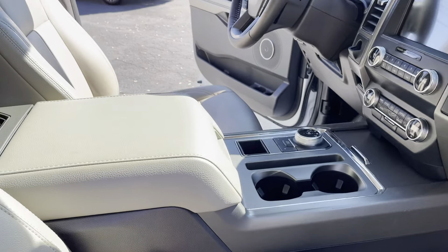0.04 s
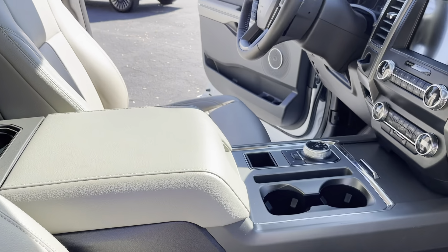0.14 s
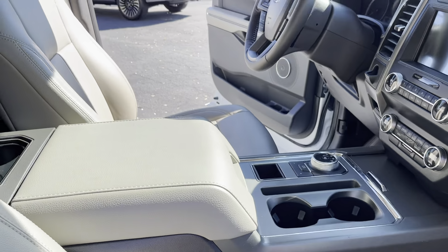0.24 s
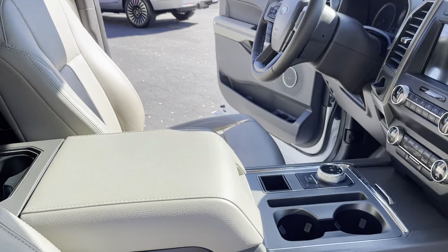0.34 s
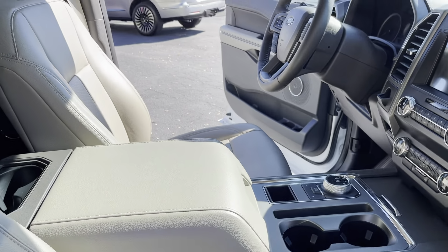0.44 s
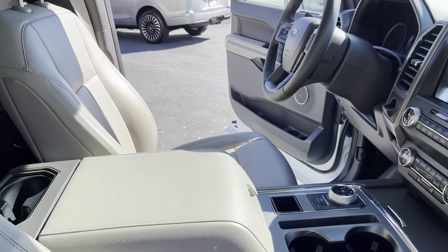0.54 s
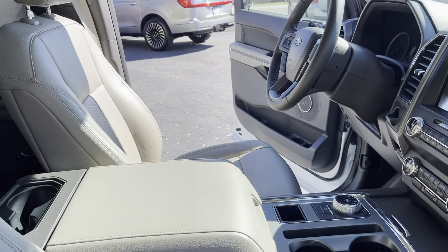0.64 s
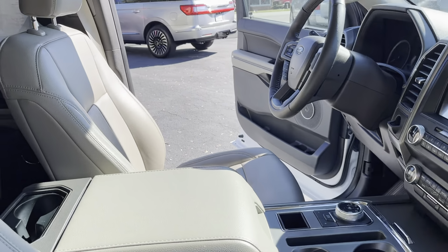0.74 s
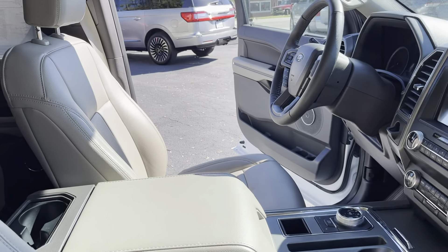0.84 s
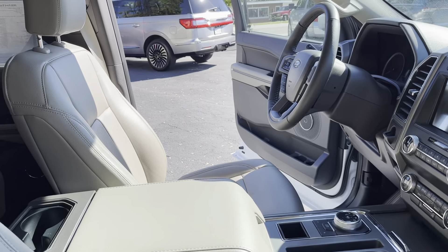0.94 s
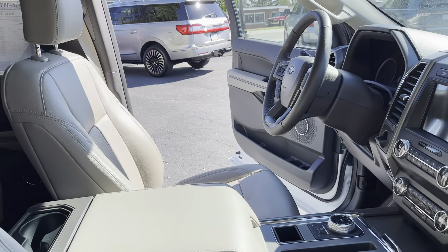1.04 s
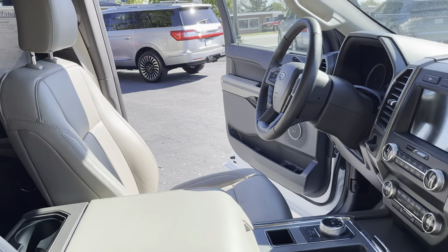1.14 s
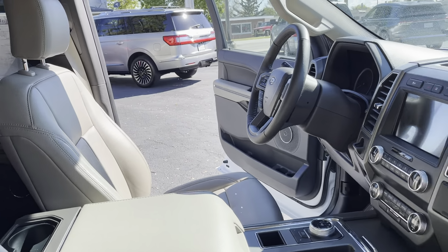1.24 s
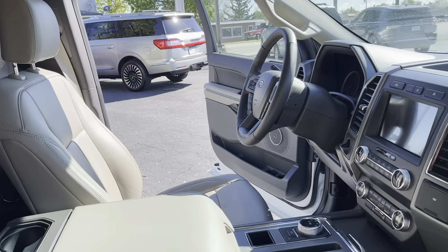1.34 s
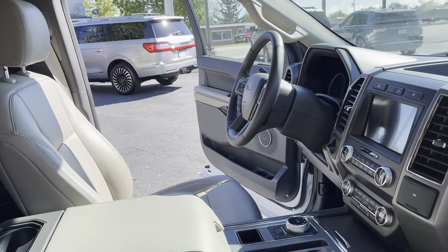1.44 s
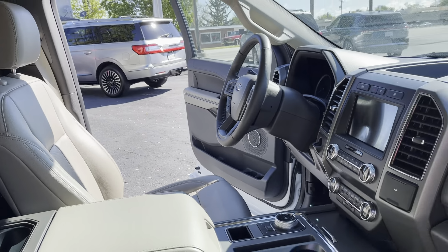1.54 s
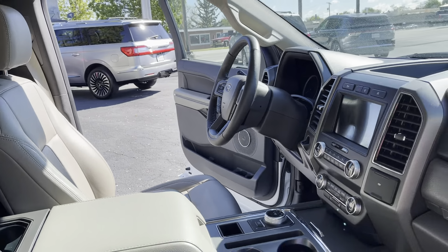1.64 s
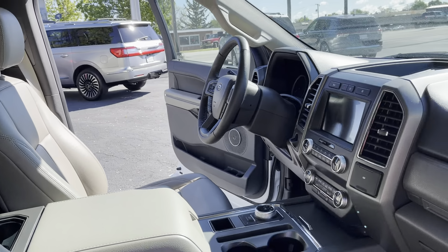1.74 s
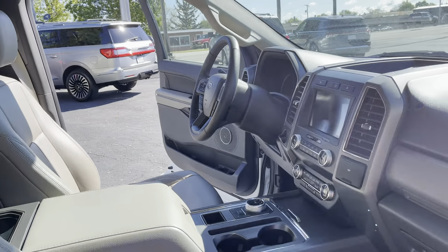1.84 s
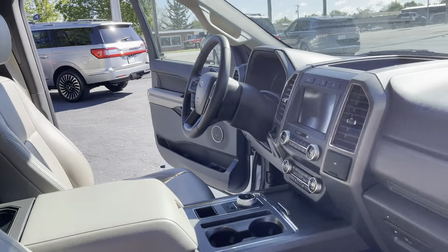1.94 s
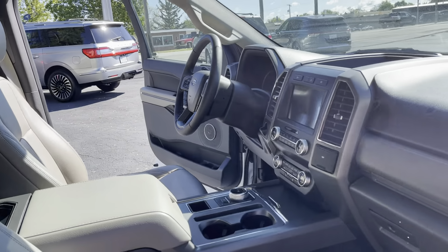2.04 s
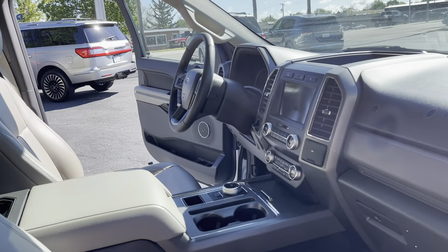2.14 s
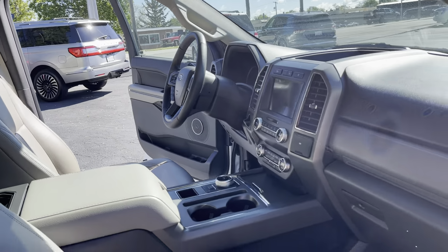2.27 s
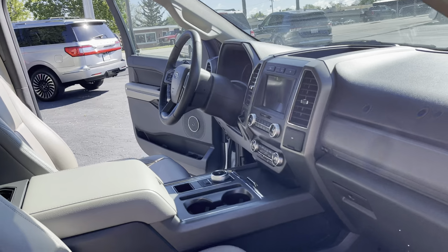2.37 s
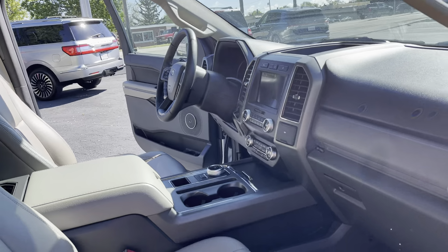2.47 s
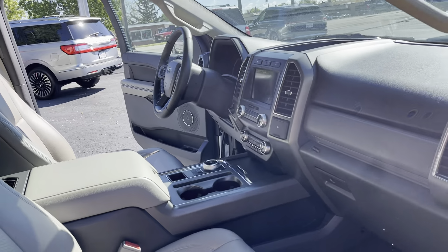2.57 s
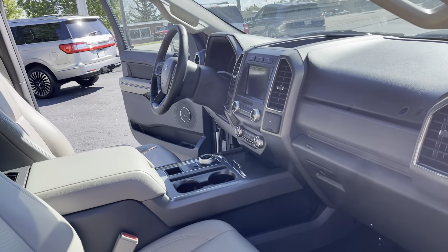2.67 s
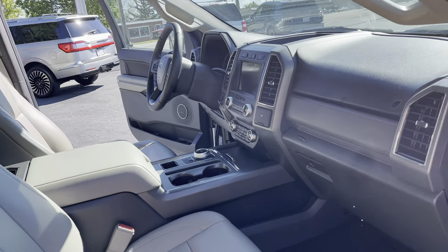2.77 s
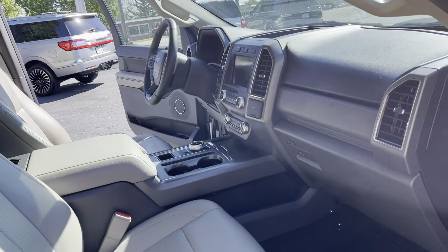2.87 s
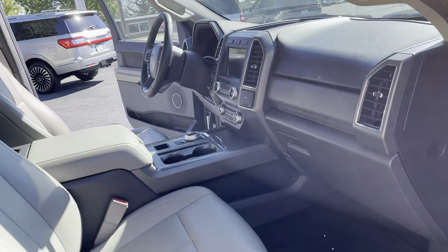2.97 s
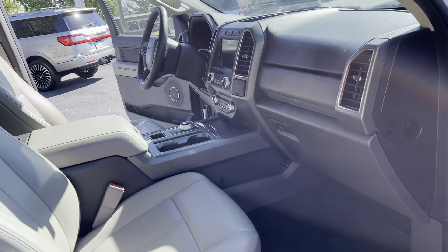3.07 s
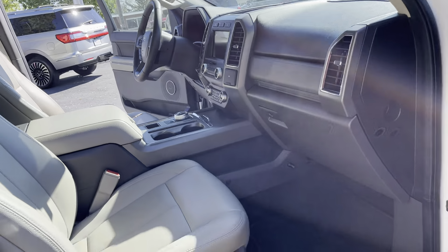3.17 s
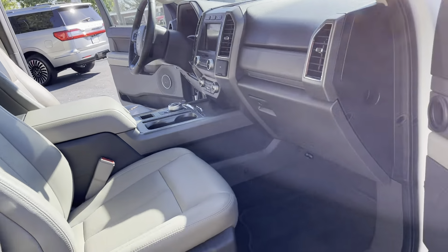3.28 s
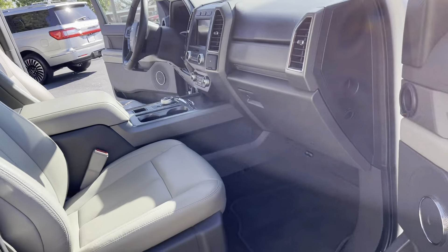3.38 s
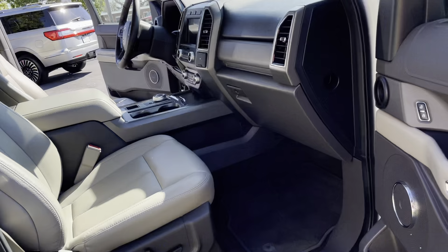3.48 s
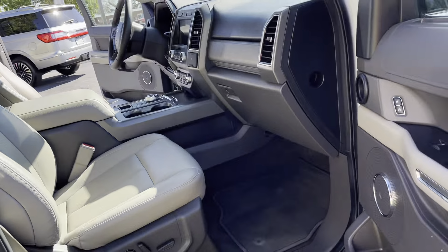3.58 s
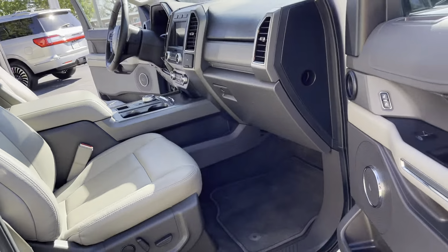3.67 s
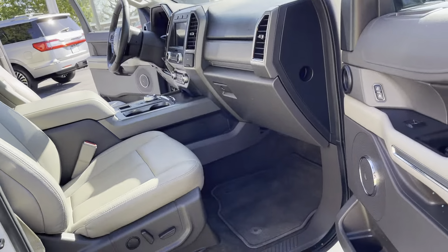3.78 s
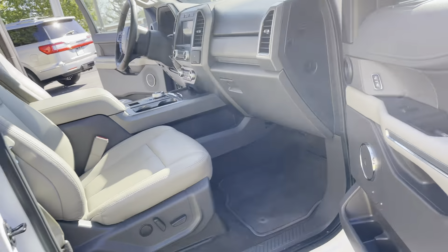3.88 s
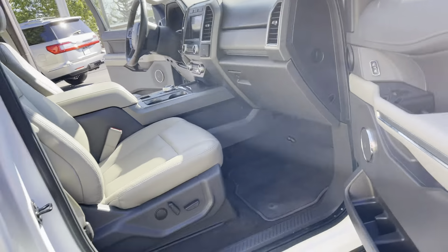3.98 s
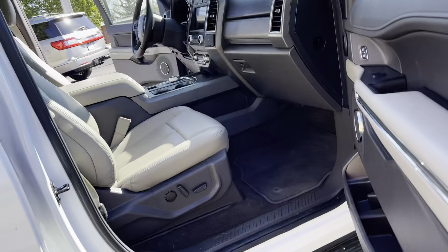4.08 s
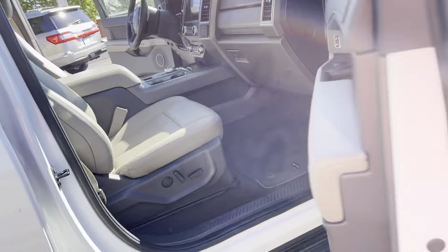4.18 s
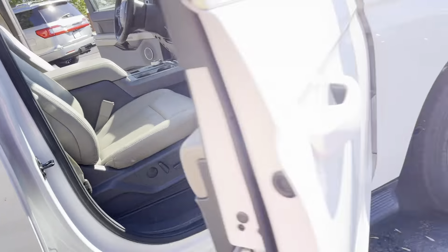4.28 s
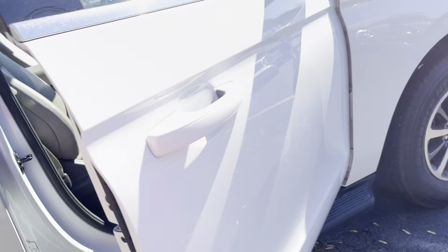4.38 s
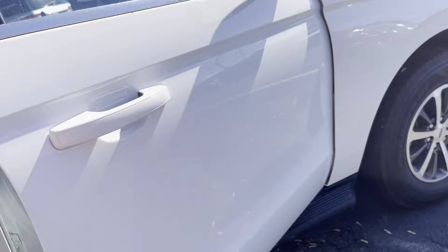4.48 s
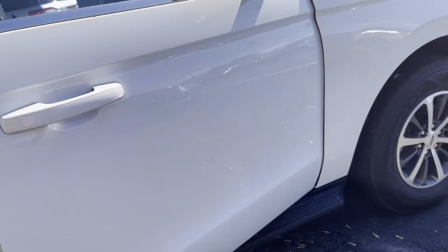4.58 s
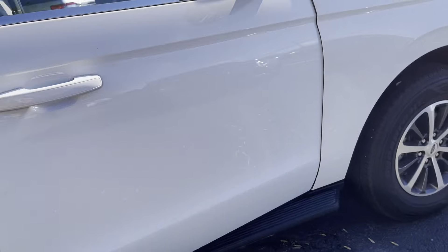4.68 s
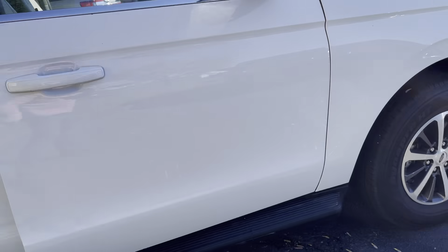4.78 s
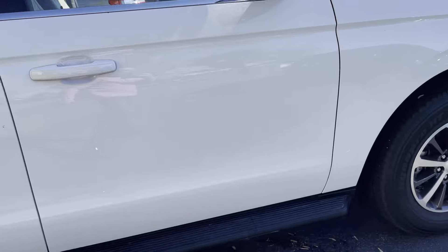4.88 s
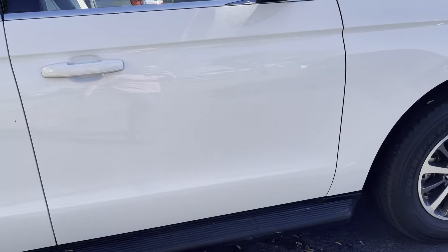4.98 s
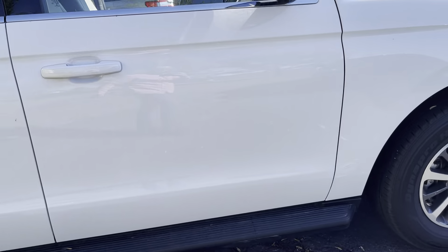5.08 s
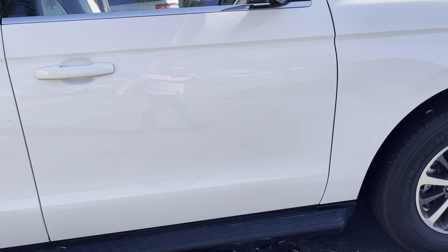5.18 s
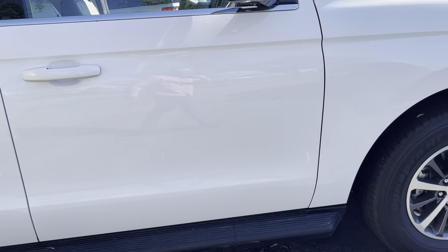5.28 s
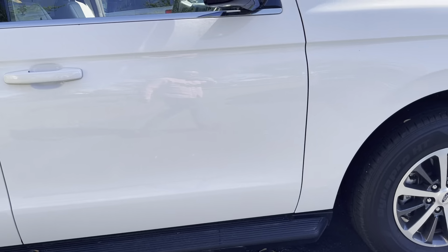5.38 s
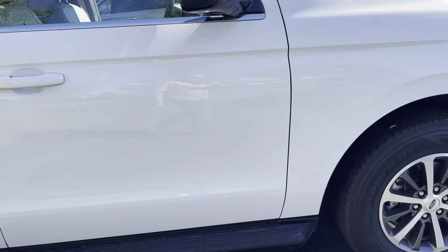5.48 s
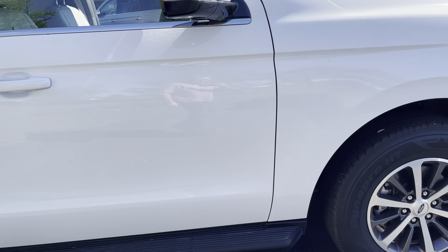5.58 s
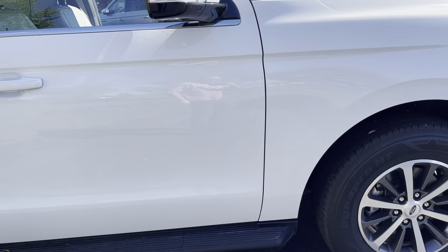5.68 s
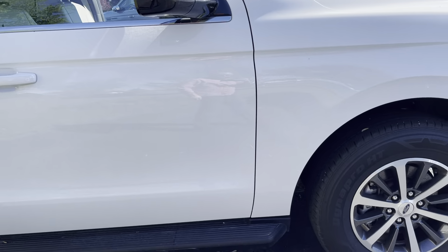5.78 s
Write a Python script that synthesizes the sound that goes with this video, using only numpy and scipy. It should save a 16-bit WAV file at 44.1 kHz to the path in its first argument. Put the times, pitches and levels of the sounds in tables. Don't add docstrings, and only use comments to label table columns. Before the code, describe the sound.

Low uneven wind buffeting and small gritty footstep sounds lead to one loud, close car door slam, followed by stronger wind rumble.

```python
import sys
import numpy as np
from scipy import signal
from scipy.fft import rfft, irfft
from scipy.io import wavfile
from scipy.ndimage import uniform_filter1d

SR = 44100
rng = np.random.default_rng(int(sys.argv[2]) if len(sys.argv) > 2 else 0)


def materialize(psi):
    bounded = np.clip(np.atleast_2d(psi).T, -1, 1)
    quanta = np.round(bounded * 32767).astype(np.int16)
    wavfile.write(sys.argv[1], SR, quanta)


def invert_db(x):
    u = np.asarray(x, float) / 20
    return 10 ** u


N = 256662

# t/s, rattle level/dB, treble against it/dB, treble t60/s
BLOWS = [
    (4.899, -41, -8, .15),
    (4.9037, -16.5, -27, 0.041),
    (4.9139, -8.5, -1.5, 0.055),
    (4.9195, -17.5, 2.5, 0.042),
    (4.925, -24, 2, 0.038),
    (4.932, -18.5, -15, 0.087),
    (4.943, -17.5, -8.5, 0.071),
    (4.952, -30, -28, 0.14),
    (4.978, -33.5, -14, 0.29),
]
# f/Hz, left-right correlation
FIELD_LIKENESS = [(60, 0.87), (130, 0.87), (270, 0.92), (590, -0.095), (1250, -0.22), (2670, 0.35),
                  (5710, 0.3), (12200, -0.04)]
# f/Hz, left-right correlation
NEAR_LIKENESS = [(60, 0.81), (130, 0.52), (270, 0.86), (590, 0.87), (1250, 0.27), (2670, 0.4), (4200, 0.69),
                 (5710, 1), (8800, .8), (10400, 0.3), (12200, 0.49)]


def read(points, hz):
    f, value = np.transpose(points)
    return np.interp(np.log(hz + 1), np.log(f + 1), value)


def curve(rows):
    s, *columns = np.transpose(rows)
    t = np.arange(N) / SR
    return [np.interp(t, s, column) for column in columns]


def evened(x):
    return x / np.sqrt(np.mean(x ** 2) + 1e-20)


def add(mix, s, sound):
    part = mix[..., round(s * SR):][..., :sound.shape[-1]]
    part += sound[..., :part.shape[-1]]


def noise(colour, likeness, band, patchy_db=0.):
    hz = np.fft.rfftfreq(1024, 1 / SR)
    a, b, c, d, patches = rng.standard_normal((N // 256 + 5, 513, 5)).T
    patches = uniform_filter1d(patches, size=8, axis=0)
    patches = evened(uniform_filter1d(patches, size=12, axis=1))
    like = np.clip(read(likeness, hz), -1, 1)[:, None]
    left, other = a + 1j * b, c + 1j * d
    z = np.array([left, like * left + np.sqrt(1 - like ** 2) * other])
    z *= invert_db(read(colour, hz)[:, None] + patchy_db * patches)
    x = signal.istft(z, nperseg=1024, noverlap=768)[1][:, :N]
    power, f = abs(rfft(x.mean(0))) ** 2, np.fft.rfftfreq(N, 1 / SR)
    in_band = (f > band[0]) & (f < band[1])
    return x / np.sqrt(2 * power[in_band].sum()) * N


def port_noise(colour, likeness):
    a, b = rng.standard_normal((2, N))
    pair = np.array([a, likeness * a + np.sqrt(1 - min(likeness, 1) ** 2) * b])
    colour_gain = invert_db(read(colour, np.fft.rfftfreq(N, 1 / SR)))
    return evened(irfft(rfft(pair) * colour_gain, N))


def lumps(per_s):
    hz = np.fft.rfftfreq(N, 1 / SR)
    return evened(irfft(rfft(rng.standard_normal(N)) / (1 + (hz / per_s) ** 4), N))


def swell(rise, t60):
    t = np.arange(SR // 2) / SR
    shape = np.sin(np.pi / 2 * np.minimum(t / max(rise, 1e-4), 1)) ** 2
    return t, shape * invert_db(-60 * np.maximum(t - rise, 0) / t60)


def ring(db, hz, rise, t60):
    t, shape = swell(rise, t60)
    return invert_db(db) * shape * np.sin(2 * np.pi * hz * t)


def wavelet(hz, cycles, turn):
    u = np.arange(0, 1, hz / (cycles * SR))
    phase = cycles * (1.364 * u - .5 * u ** 2) + turn
    return np.cos(2 * np.pi * phase) * np.sin(np.pi * u ** 0.68) ** 2


def door():
    # f/Hz, density/dB per Hz
    rattle = [(240, -18), (400, -4.5), (812, -11.5), (1130, -27), (1350, -17.5), (1630, -26.5), (1910, -21),
              (3930, -26), (4810, -25.5), (6510, -30.5), (8320, -28.5), (12100, -32.5), (13000, -44),
              (13700, -68), (15200, -48), (16200, -90)]
    # f/Hz, left over right/dB
    balance = [(60, 0), (110, -1), (200, -1), (350, 4.5), (640, 3), (1150, 3.5), (2080, 1.5), (3750, 3.0),
               (6760, 3.5), (12200, 1)]
    # t/s, peak level/dB, f/Hz, rise/s, t60/s
    modes = [(4.9011, -18, 1383, 0.0038, 0.028), (4.9035, -24, 800, 0.0048, 0.031),
             (4.902, -24, 400, .004, .04), (4.9140, -17, 660, 0.0032, 0.058),
             (4.914, -20, 450.6, .004, 0.18), (4.9144, -26, 805, 0.0053, 0.035),
             (4.9149, -19, 552, .004, 0.087), (4.9147, -14.5, 244.4, 0.009, 0.22),
             (4.9152, -19, 301, 0.0039, 0.26), (4.9132, -13, 206.7, 0.005, 0.17),
             (4.9145, -18, 470, 0.0023, 0.036), (4.9178, -10.5, 796, .0025, 0.046),
             (4.9217, -16.5, 149.1, 0.01, 0.45), (4.912, -8, 77.3, 0.025, 0.098),
             (4.9194, -14, 123.3, .012, 0.25), (4.922, -15.5, 49.5, 0.029, 0.44),
             (4.9361, -7, 64.2, 0.032, 0.077), (4.9440, -13, 418, 0.0031, 0.057),
             (4.950, -23, 701, 0.0051, 0.06), (4.931, -22, 751, .004, .07), (4.968, -27, 377, .004, .07),
             (4.99, -34, 620, .005, .08)]
    low, high, out = np.zeros(N), np.zeros(N), np.zeros((2, N))
    for s, db, treble_db, t60 in BLOWS:
        add(low, s, invert_db(db) * swell(0.0016, 1.15 * t60)[1])
        add(high, s, invert_db(db + treble_db) * swell(0.00068, t60)[1])
    hz = np.fft.rfftfreq(N, 1 / SR)
    shiver = rfft(noise(rattle, NEAR_LIKENESS, (300, 15000)))
    shiver *= invert_db(np.outer([.5, -.5], read(balance, hz)) - 3.5)
    upper = 1 / (1 + (2200 / (hz + 1)) ** 4)
    chatter = invert_db(0.64 * lumps(per_s=630))
    out += low * irfft(shiver * (1 - upper), N)
    out += high * chatter * irfft(shiver * upper, N)
    for s, db, mode_hz, rise, t60 in modes:
        side_db = read(balance, mode_hz) / 2
        sound = ring(db, mode_hz, rise, t60)
        if mode_hz > 180:
            sound = sound + ring(db - 11.5, mode_hz * 1.07, 3 * rise, t60)
        add(out[0], s, invert_db(side_db) * sound)
        add(out[1], s + 0.00019, invert_db(-side_db) * sound)
    return out


def tap():
    # f/Hz, level/dB, t60/s
    skin = [
        (1620, 3.5, 0.012),
        (2040, -26, 0.023),
        (2980, -11, 0.017),
    ]
    # delay/s, level/dB
    paths = [
        (0, 1),
        (.0048, -11),
        (.0075, -12),
    ]
    # f/Hz, density/dB per Hz
    crack_colour = [(530, -49), (900, -19), (2040, -2.5), (2600, -11), (4680, -20), (5340, -25),
                    (8500, -22), (11600, -34), (12700, -63), (16500, -93), (22000, -120)]
    tap_s, tap_db, crack_t60 = 4.1103, -24.5, .03
    knock = sum(ring(db, hz, 0.0003, t60) for hz, db, t60 in skin)
    out, crack = np.zeros((2, N)), np.zeros(N)
    for lag, db in paths:
        add(out[0], tap_s + lag, invert_db(tap_db + db) * knock)
        add(out[1], tap_s + lag * 1.06 + 0.0001, invert_db(tap_db + db - 1.5) * knock)
        add(crack, tap_s + lag, invert_db(tap_db + db - 10.0) * swell(0.00044, crack_t60)[1])
    return out + crack * noise(crack_colour, NEAR_LIKENESS, (1000, 12000))


def wind():
    # t/s, level/dB
    strength = [(0.0, -39.5), (.34, -61.5), (.58, -48.5), (.91, -59), (1.2, -50.5), (1.92, -56),
                (2.34, -45), (3.04, -42.5), (3.26, -47.5), (3.48, -45), (3.7, -54.5), (4.42, -43),
                (4.56, -38.5), (4.64, -46.5), (4.88, -46.5), (5.08, -36), (5.2, -39.5), (5.82, -35)]
    # f/Hz, density/dB per Hz
    rumble = [(20, -14), (40, 1.5), (62, 11), (95, 6), (140, -5.5), (220, -67.5), (9000, -70),
              (13200, -135)]
    # f/Hz, density/dB per Hz
    flutter = [(60, -27), (130, 1.5), (250, -7), (450, -15), (800, -57), (9000, -59), (13200, -125)]
    # t/s, peak level/dB, f/Hz
    eddies = [(0.506, -33.5, 221), (0.566, -34, 130), (1.311, -34.5, 165), (2.416, -30.5, 131),
              (2.518, -30.5, 128), (2.677, -30.5, 132), (2.722, -26.5, 186), (2.768, -20.5, 161),
              (2.953, -29.5, 151), (3.005, -26.5, 205), (3.049, -30, 181), (3.353, -23.5, 332),
              (3.39, -32, 136), (3.419, -32, 210), (4.426, -35, 223), (4.462, -25, 138), (4.509, -22, 220),
              (4.574, -31.5, 126), (4.616, -33.5, 228), (4.753, -32, 213), (5.47, -26.5, 181),
              (5.508, -24, 155), (5.542, -24, 180), (5.609, -18, 227), (5.653, -16.5, 230),
              (5.686, -24, 170), (5.704, -22.5, 153), (5.716, -22, 262), (5.749, -15, 278),
              (5.768, -20, 149),
              (0.019, -32, 67), (1.42, -34, 63), (5.085, -24.5, 57.4), (5.185, -23, 63), (5.244, -28, 62),
               (5.276, -25, 127.6), (5.322, -23.5, 74), (5.475, -24, 70), (5.533, -26, 332),
               (5.549, -29.5, 297), (5.585, -21, 78), (5.772, -23.5, 106)]
    # t/s, peak level/dB
    spits = [(.566, -43.5), (2.845, -43.5), (3.163, -42.5), (3.353, -31), (3.508, -50), (4.425, -55),
             (5.609, -41), (5.749, -35), (5.704, -44), (5.764, -41)]
    flutter_db, flutter_follows = -19.5, .75
    crest_db = -28
    wind_db = curve(strength)[0]
    slam_s = BLOWS[2][0]
    shelter_db = -2.5 * (np.arange(N) > slam_s * SR)
    gust = 1.2 * np.tanh(lumps(per_s=16) / 1.53)
    out = port_noise(rumble, likeness=0.87) * invert_db(wind_db + 2.5 * gust + 2.0)
    flutter_level = flutter_follows * wind_db + flutter_db + shelter_db + 8.7 * gust
    out += port_noise(flutter, likeness=0.68) * invert_db(flutter_level)
    turns = rng.random(size=(52, 3))
    for (s, db, hz), turn in zip(eddies, turns):
        add(out, s + 0.00076, invert_db(db - 3.0) * wavelet(hz, 3.21, turn[0]))
        add(out, s + 0.00037, invert_db(db + crest_db) * wavelet(400 + 140 * turn[2], 3.7, turn[1]))
    for (s, db), turn in zip(spits, turns[::-1]):
        add(out, s + 0.00027, invert_db(db) * wavelet(400 + 140 * turn[2], 4.98, turn[1]))
    return out


def ripples():
    # t/s, peak level/dB, f/Hz, length/cycles
    swirls = [(.055, -34, 200, 3.3), (0.354, -38, 69.6, 2.6), (.46, -39, 90, 1.9), (1.0, -40, 150, 3.1),
              (3.503, -50, 497, 2.9), (4.71, -42, 149, 3.1), (4.783, -39.5, 179, 3.4),
              (5.363, -36, 147, 4.1), (5.408, -46, 245, 2), (2.656, -37, 99, 3.8), (2.688, -38, 274, 6.8),
              (2.700, -28, 100, 2.5), (2.78, -34.5, 268, 4.2), (2.803, -36.5, 260, 3.5),
              (2.810, -31, 120, 2.6), (2.835, -38, 217, 3.4), (2.846, -38, 131, 2.5),
              (2.862, -39, 249, 2.3), (4.443, -41, 230, 2.6), (4.455, -34.5, 231, 2.7),
              (4.516, -34, 388, 5.3), (4.520, -26, 111, 2.1), (4.532, -37, 283, 2.7),
              (4.543, -38, 131, 2.8), (4.628, -30.5, 222, 2.2), (5.596, -35.5, 330, 4.3),
              (5.618, -38, 400, 5.9), (5.659, -27, 342, 5.2), (5.663, -25, 109, 2.6),
              (5.688, -29.5, 402, 5.9), (5.697, -29, 397, 5.5), (5.707, -23.5, 330, 3.4),
              (5.716, -33, 516, 5), (5.725, -29, 150, 3.7), (5.755, -27.5, 422, 6.4),
              (5.765, -27.5, 430, 4.3), (5.778, -30, 201, 3.2), (5.785, -31.5, 120, 2.4)]
    lean_db = 9.5
    out = np.zeros((2, N))
    for (s, db, hz, cycles), (turn, lean) in zip(swirls, rng.random((len(swirls), 2))):
        port_db = lean_db * (lean - .5) * np.array([[1], [-1]])
        add(out, s, invert_db(db + port_db) * wavelet(hz, cycles, turn))
    return out


def steps():
    # t/s, level/dB
    brush = [(0.0, -92), (0.74, -74), (1.6, -81), (2.09, -78.5), (2.71, -77), (3.03, -67), (3.09, -57.5),
             (3.33, -61.5), (3.6, -70), (4.5, -71.5), (4.85, -67), (5.82, -69)]
    # f/Hz, density/dB per Hz
    grit = [(1470, -6.5), (2500, -0.5), (2960, -3), (3150, -4), (3610, -1.5), (3860, -4), (5460, -2.5),
            (8540, 1), (10300, -0.5), (11400, -7.5), (12700, -48), (13500, -90), (16500, -100),
            (22000, -120)]
    # t/s, peak level/dB, dull part/dB, t60/s
    snaps = [(0.745, -45, -15, 0.039), (0.818, -46, -17, 0.037), (0.83, -41, -16, 0.061),
             (1.217, -49, 5, 0.13), (2.1275, -58, -1, 0.17), (2.1515, -38, -11, 0.088),
             (2.7821, -34.5, -0.5, 0.13), (2.887, -51.5, 17.5, 0.07), (3.037, -45, -18, 0.023),
             (3.044, -43.5, -18, .03), (3.0683, -37.5, -18, 0.04), (3.073, -46, -18, 0.051),
             (3.5598, -64, 21, 0.063), (3.7763, -57.5, -16, 0.12), (3.935, -40.5, -21, 0.066),
             (4.08, -49.5, -14, 0.1), (4.085, -52, -12, 0.59), (4.152, -58, 21, 0.17),
             (4.42, -56, 10, 0.22), (4.4854, -56, -3, 0.084), (4.75, -66, 19.5, 0.092),
             (5.335, -54, 5, 0.19), (5.396, -48.5, -11, 0.11)]
    # t/s, peak level/dB, dull part/dB, rise/s, t60/s
    scuffs = [
        (3.255, -60.5, -1, 0.028, 0.079),
        (3.562, -80, 28, 0.025, 0.22),
        (3.63, -74, -12, .03, 0.11),
        (4.188, -57.5, -3, 0.021, 0.12),
    ]
    # t/s, peak level/dB, f/Hz, rise/s, t60/s
    chinks = [(.001, -46, 740, 0.01, 0.12), (.03, -45.5, 764, 0.0088, 0.14), (.11, -52, 745, 0.022, 0.15),
              (.744, -63, 6400, .003, .06), (.820, -51.5, 6370, .005, 0.041), (1.217, -64, 3600, .003, .06),
              (3.072, -50.5, 2390, .004, 0.069), (3.163, -45.5, 880, 0.0022, 0.027),
              (3.575, -41, 346, 0.032, 0.1), (3.580, -48.5, 595, 0.018, 0.091),
              (3.590, -46.5, 231, 0.049, 0.12), (3.922, -52, 3480, 0.0024, 0.02),
              (3.924, -47.5, 900, .002, 0.03), (5.599, -62, 4400, .002, 0.029)]
    # f/Hz, density/dB per Hz
    knock = [(400, -32), (800, 8.5), (1500, 5.5), (2600, -5.0), (4000, -13), (9000, -53), (13500, -110)]
    split = [(4000, -33), (6300, -2), (9000, 11.0), (12000, 0), (13600, -24), (15200, -10), (15800, -16),
             (16300, -60)]
    bright, dull, crack = np.zeros((3, 2, N))
    for s, db, dull_db, t60 in snaps:
        gain = invert_db(db - 15.0)
        add(bright, s, gain * swell(0.001, t60)[1])
        add(crack, s, gain * invert_db(8.5) * swell(0.00087, 0.017)[1])
        add(dull, s, gain * invert_db(dull_db - 1.0) * swell(0.00049, t60)[1])
    for s, db, dull_db, rise, t60 in scuffs:
        shape = swell(rise, t60)[1]
        add(bright, s, invert_db(db) * shape)
        add(dull, s, invert_db(db + dull_db) * shape)
    bright += invert_db(curve(brush)[0] - 4.5 + 0.79 * lumps(per_s=19))
    out = bright * noise(grit, FIELD_LIKENESS, (5000, 12500), patchy_db=2.2)
    out += crack * noise(split, NEAR_LIKENESS, (5000, 12500))
    out += dull * noise(knock, FIELD_LIKENESS, (1000, 3000))
    for s, *mode in chinks:
        add(out, s, ring(*mode))
    return out


def ticks():
    # t/s, peak level/dB, f/Hz, t60/s
    pings = [(.737, -62, 6200, .03), (.778, -62, 6400, .03), (2.153, -56, 7740, .05),
             (2.153, -62, 6400, .04), (2.783, -54, 1554, .04), (2.783, -53, 1965, 0.077),
             (2.784, -46, 2970, .03), (2.860, -53, 1355, 0.087), (2.888, -47.5, 1430, 0.036),
             (3.561, -42.5, 1380, .012), (3.561, -52, 1900, .012), (3.924, -54, 2190, .02),
             (4.153, -44, 1680, 0.016), (4.154, -59, 3280, .012), (3.268, -57, 2680, .06),
             (3.268, -60, 3500, .06), (3.283, -58, 6000, .03), (4.196, -55, 2550, .07),
             (4.188, -58, 2300, .04), (4.506, -48, 770, 0.018), (5.148, -64, 7900, .04),
             (4.412, -57, 1040, .03), (4.433, -43, 685, 0.023), (4.486, -58, 1950, 0.036),
             (4.900, -51, 3450, .02), (4.904, -38, 5250, .03), (4.9154, -18.5, 8990, .045),
             (4.943, -32.5, 4750, 0.044), (4.914, -31, 2750, .05), (4.913, -33, 4400, .05),
             (4.914, -34, 5900, .04), (4.914, -34, 6150, 0.087), (4.914, -29, 1940, 0.05),
             (4.919, -29, 1326, 0.077), (4.921, -36.5, 2433, 0.093), (4.922, -22.5, 959, 0.088),
             (4.924, -30, 6860, .04), (4.932, -38, 1780, 0.041), (4.945, -38, 1150, 0.045),
             (4.961, -36, 1406, 0.048)]
    out = np.zeros((2, N))
    for s, db, hz, t60 in pings:
        add(out[0], s, ring(db + 4.0, hz, 0.0012, t60))
        add(out[1], s + .00005, ring(db + 1.5, hz, 0.00092, t60))
    return out


def birds():
    # t/s, length/s, f/Hz, level/dB
    held = [(.532, 0.056, 5420, -75), (0.688, 0.04, 3750, -69), (0.91, 0.063, 2540, -65),
            (.98, 0.048, 2550, -68), (1.243, 0.042, 2560, -60.5), (.165, 0.036, 4500, -74),
            (0.865, .022, 3600, -67), (.885, .015, 5750, -74), (1.785, .035, 3950, -78),
            (5.63, 0.032, 5750, -75), (1.346, .061, 2370, -66.5), (1.402, 0.056, 2930, -66.5),
            (1.432, 0.078, 3107, -64), (1.608, 0.071, 4860, -73), (1.872, 0.072, 3640, -70.5),
            (1.912, 0.11, 2620, -61), (1.934, 0.085, 2393, -61), (2.03, .03, 3480, -65.5),
            (2.042, 0.034, 3050, -64), (2.54, 0.08, 4100, -77), (5.7, .017, 4400, -64),
            (5.72, .035, 5100, -65), (5.78, .04, 3840, -69)]
    # t/s, start f/Hz, level/dB
    rising = [
        (.105, 3150, -72),
        (.29, 3400, -68),
        (.64, 3250, -76),
        (2.265, 4950, -75),
    ]
    # t/s, start f/Hz, level/dB
    falling = [(.578, 5300, -77), (.825, 4650, -73), (0.871, 2980, -63.5), (.918, 3940, -67),
               (1.13, 7340, -73), (1.247, 3880, -69), (1.445, 7380, -72.5), (1.45, 4150, -71.5),
               (1.645, 5000, -69.5), (5.05, 4360, -78), (5.105, 3600, -75), (1.215, 4700, -74)]
    # t/s, length/s, start f/Hz, end f/Hz, level/dB
    glides = [(.46, .075, 3300, 5300, -71), (.46, .04, 3300, 3900, -66), (.655, .03, 3400, 4400, -71),
              (.6, .03, 4700, 4100, -74), (1.745, .04, 3450, 3950, -69), (.345, .03, 4500, 5200, -80),
              (5.09, .03, 3650, 3500, -68), (5.13, .02, 3400, 3800, -71), (5.655, .04, 5500, 4300, -70),
              (2.33, .16, 4050, 5250, -76), (2.5, .1, 5200, 5500, -83), (5.763, .018, 4780, 3850, -63)]
    rise_s, rise_ratio, fall_s, fall_ratio = .075, 1.36, .048, .85
    song = np.zeros(N)
    waver = 1 + .012 * lumps(per_s=90)
    whistles = glides + [(s, length, hz, hz, db) for s, length, hz, db in held]
    whistles += [(s, rise_s, hz, hz * rise_ratio, db) for s, hz, db in rising]
    whistles += [(s, fall_s, hz, hz * fall_ratio, db) for s, hz, db in falling]
    for s, length, start_hz, end_hz, db in whistles:
        count = int(length * SR)
        hz = np.linspace(start_hz, end_hz, count) * waver[int(s * SR):][:count]
        whistle = np.sin(2 * np.pi * np.cumsum(hz) / SR)
        add(song, s, invert_db(db) * whistle * signal.windows.tukey(count, .3))
    song *= invert_db(2.4 * lumps(per_s=70))
    t = np.arange(6000) / SR
    echoes = rng.standard_normal((2, 6000)) * invert_db(-60 * t / 0.2)
    echoes *= invert_db(-.5) / np.linalg.norm(echoes[0])
    return song + signal.oaconvolve(song[None], echoes, axes=1)[:, :N]


def traffic():
    # t/s, level/dB
    road_level = [
        (0.0, -50.5),
        (1.22, -56),
        (2.01, -54),
        (5.48, -59),
        (5.82, -58),
    ]
    # f/Hz, density/dB per Hz
    road = [(88, -35), (150, -2.5), (191, -7), (465, -12), (700, -7), (1420, -13.5), (1900, -18.5),
            (2500, -23.5), (2850, -29), (5390, -38.5), (8900, -54.5), (12600, -58), (13200, -115),
            (22000, -130)]
    # f/Hz, density/dB per Hz
    tyres = [(480, -31), (575, 6), (650, -28), (740, 2.5), (830, -27), (1050, -8.5), (1150, -4),
             (1240, -17), (1330, -4.5), (1450, -27), (2700, -43.5), (12900, -43.5), (13300, -115)]
    wash = noise(road, FIELD_LIKENESS, (400, 2500), patchy_db=1.0)
    drone = noise(tyres, FIELD_LIKENESS, (400, 2500), patchy_db=4.5)
    return (wash + invert_db(-6) * drone) * invert_db(curve(road_level)[0] - 3.0)


def scene():
    return door() + tap() + wind() + ripples() + steps() + ticks() + birds() + traffic()


def roll_off(x):
    return signal.sosfilt(signal.butter(12, 15800, fs=SR, output="sos"), x)


def record(dry):
    # f/Hz, width/Hz, level/dB
    port_null = (10170, 340, -17)
    hz, width, db = port_null
    ceiling = .97
    dip = invert_db(db * np.exp(-((np.fft.rfftfreq(N, 1 / SR) - hz) / width) ** 2))
    mid, side = dry.mean(0), (dry[0] - dry[1]) / 2
    mid = irfft(rfft(mid) * dip, N)
    pair = np.array([mid + side, mid - side]) / ceiling
    limited = ceiling * pair / (1 + pair ** 4) ** (1 / 4)
    return roll_off(limited)


dry = scene()
out = record(dry)
materialize(out)
```